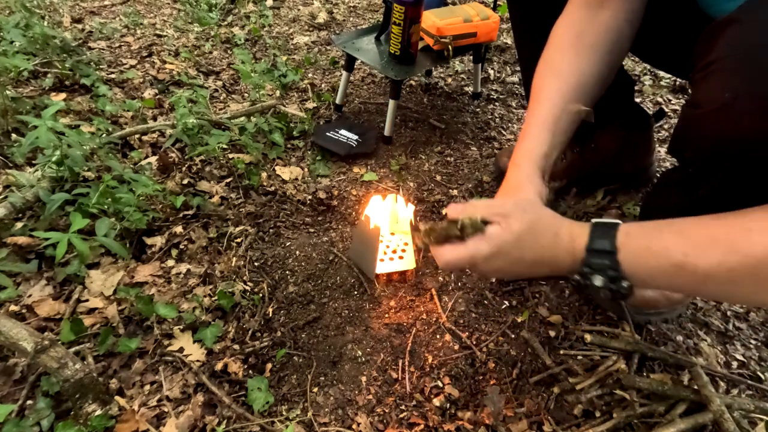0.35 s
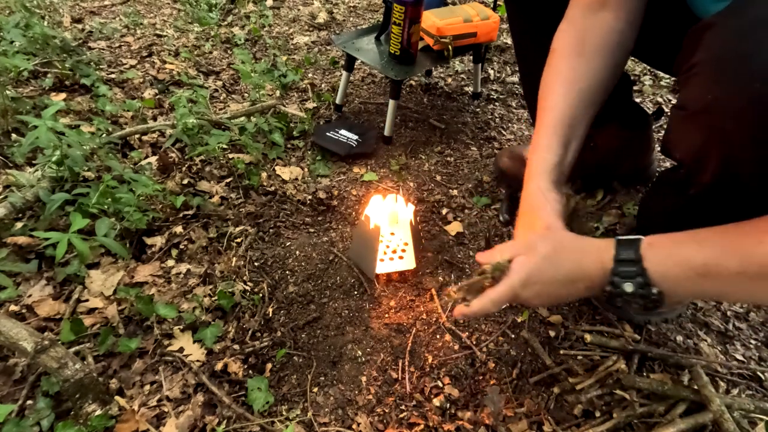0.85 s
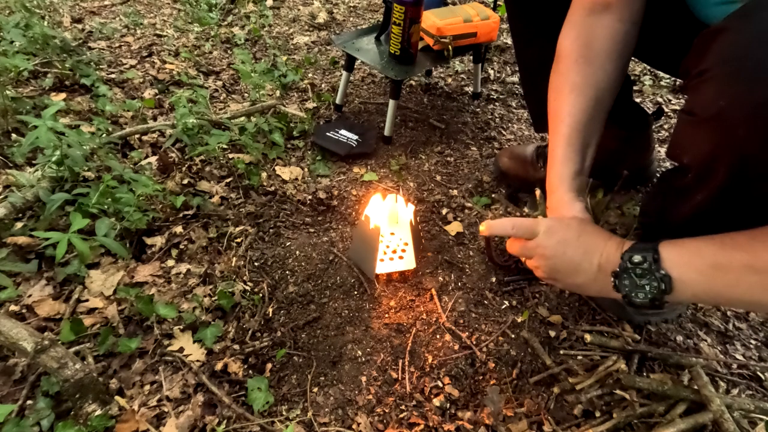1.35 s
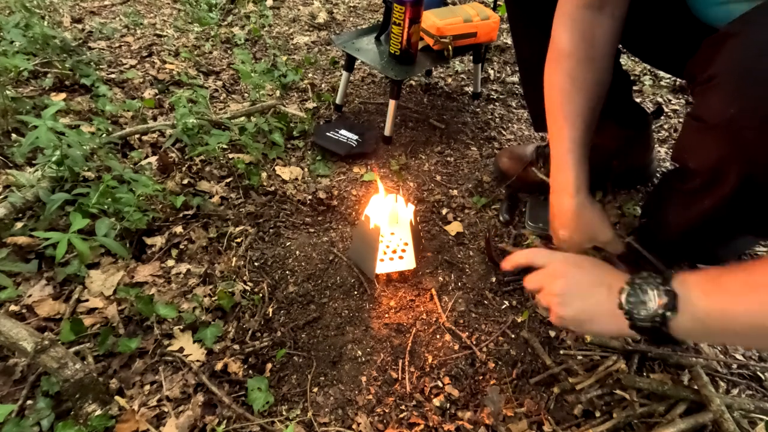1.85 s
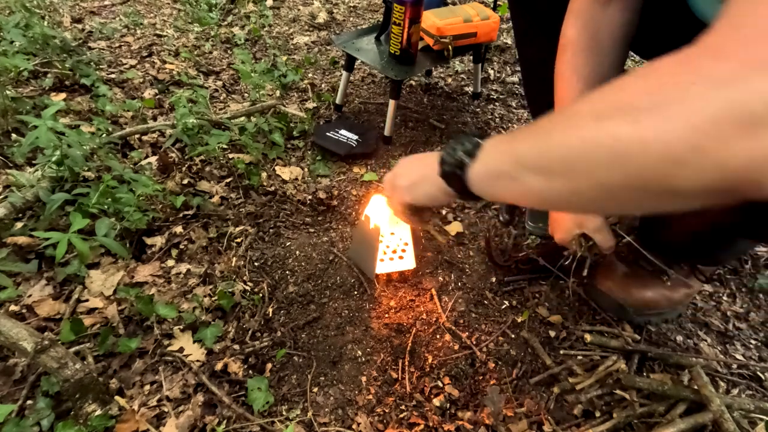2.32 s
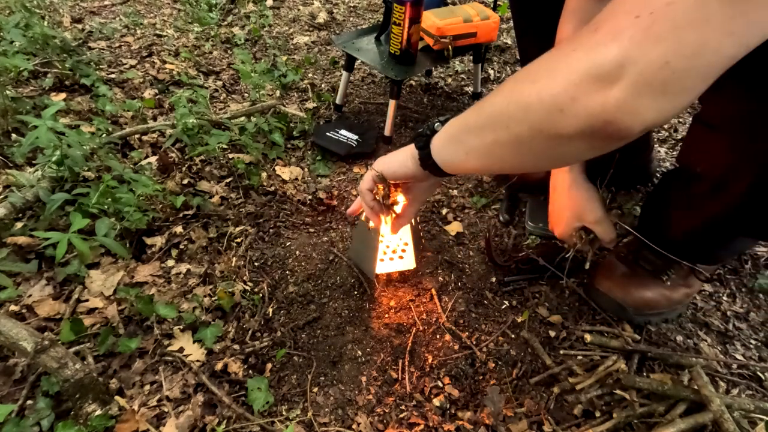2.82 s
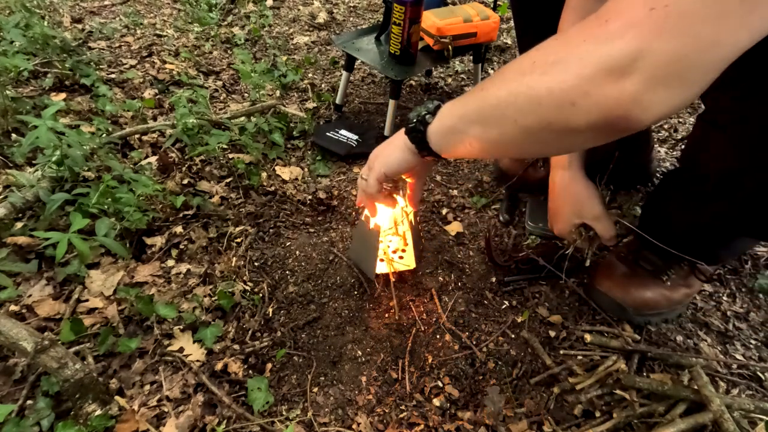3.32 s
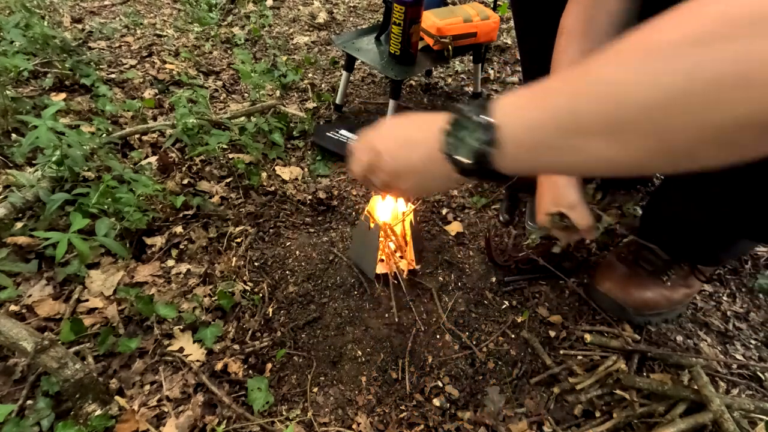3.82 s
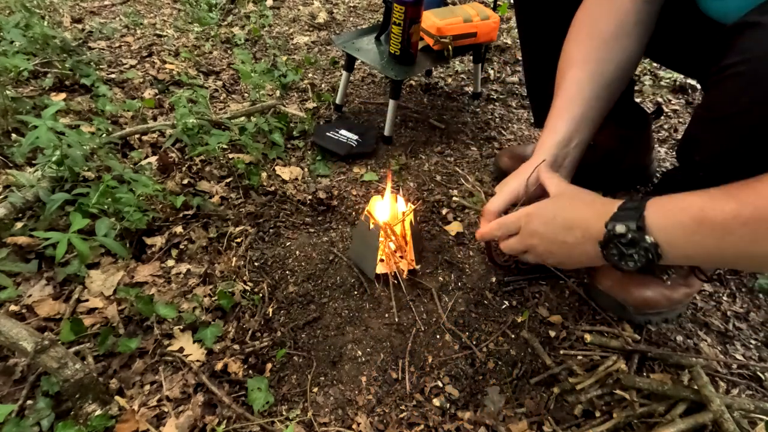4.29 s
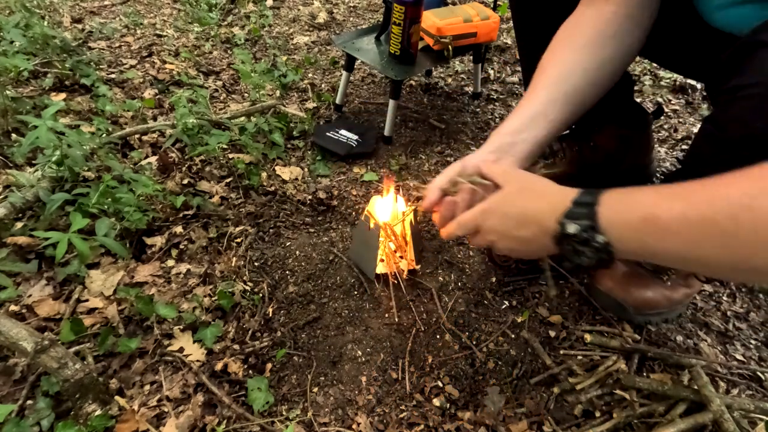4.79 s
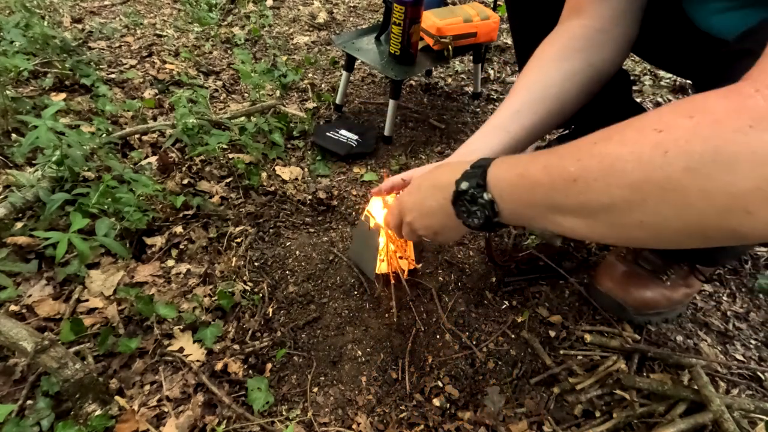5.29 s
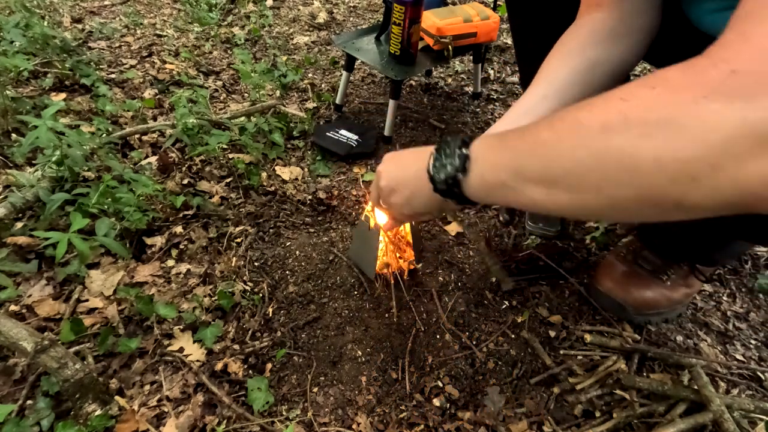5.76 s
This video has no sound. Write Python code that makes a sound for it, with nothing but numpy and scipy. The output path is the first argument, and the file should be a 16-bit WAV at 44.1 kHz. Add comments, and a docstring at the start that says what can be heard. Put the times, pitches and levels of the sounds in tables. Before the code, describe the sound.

Close up, a bundle of dry twigs is squeezed and broken in a dense, irregular run of sharp cracks, loudest just before two seconds. Cloth swishes as an arm reaches over, then twigs clink and scrape against a thin metal stove. After a quieter pause with faint crackles, a second load taps the metal more softly. Quiet woodland, soft flames and slight low wind; close stereo microphone.

```python
"""Dry twigs snap in the hands: filtered noise bursts, each with a ringing tone and a smaller crack near it.
Faint crackles of the fire follow by the same means, and low pressure pulses thump with some of the breaks.
The bundle crunches as gritty noise; twigs knock and scrape a small sheet-metal wood stove, heard as
a bank of decaying wall modes. Cloth swishes as the arms move, over woodland hush, flames and
light wind on two microphone ports, all of it shaped noise."""
import sys
import numpy as np
from scipy import signal
from scipy.fft import rfft, irfft, next_fast_len
from scipy.io import wavfile
from scipy.ndimage import uniform_filter1d

SR = 44100
rng = np.random.default_rng(int(sys.argv[2]) if len(sys.argv) > 2 else 0)


def invert_db(level):
    """Linear amplitude ratio for a level in decibels (20 dB per decade), elementwise."""
    return 10 ** (np.asarray(level, dtype=float) / 20)


def store_wav(level_fs):
    """Save 16-bit WAV to argv[1]."""
    pcm = np.round(np.clip(np.atleast_2d(level_fs), -1, 1) * 32767)
    wavfile.write(sys.argv[1], SR, pcm.T.astype(np.int16))


N = 270774  # length in samples


def evened(x):
    """Normalization: scales a signal to rms 1."""
    return x / np.sqrt(np.mean(x ** 2) + 1e-20)


def read(points, hz, column=1):
    """Interpolation on a logarithmic frequency axis, close to the ear's own scale."""
    points = np.transpose(points)
    return np.interp(np.log(hz + 1), np.log(points[0] + 1), points[column])


def follow(rows, column=1):
    """Envelope in dB: straight lines between the rows, silent outside their span."""
    rows = np.transpose(rows)
    return np.interp(np.arange(N) / SR, rows[0], rows[column], left=-200, right=-200)


def coloured(x, tone):
    """Linear filtering: weights the spectrum by the tone curve, silent outside it, at rms 1."""
    size = next_fast_len(N)
    hz = np.fft.rfftfreq(size, 1 / SR)
    inside = (hz >= tone[0][0]) & (hz <= tone[-1][0])
    weighted = rfft(x, size) * invert_db(read(tone, hz)) * inside
    return evened(irfft(weighted, size)[:N])


def drift(seconds):
    """Slow random fluctuation: white noise averaged twice, at rms 1."""
    size = round(seconds * SR)
    once = uniform_filter1d(rng.standard_normal(N), size)
    return evened(uniform_filter1d(once, size))


def grit(per_s, spread_db):
    """Random impulse train: sparse clicks of random sign, a few of them large."""
    when, sign, size = rng.random((3, N))
    size_db = spread_db * np.minimum(-np.log(size + 1e-9), 3)
    return (when < per_s / SR) * np.sign(sign - .5) * invert_db(size_db)


def add(mix, s, sound):
    """Superposition: mixes a sound in at s seconds."""
    part = mix[round(s * SR):][:len(sound)]
    part += sound[:len(part)]


def stroke_db(start, length, db, edge_db=-6.5):
    """Envelope of one stroke: an arch in dB, lower at both ends and silent outside."""
    u = (np.arange(N) / SR - start) / length
    return np.where((u > 0) & (u < 1), db + edge_db * (2 * u - 1) ** 2, -200)


def band_pass(x, band_hz):
    """Band-pass filtering between a low and a high corner."""
    return signal.sosfilt(signal.butter(2, band_hz, "band", fs=SR, output="sos"), x)


# Twigs cracking in the first two seconds, then faint crackles of the fire. Each row: start in seconds,
# relative level of the crack band in dB, thickness as the knock band against it in dB,
# ringing frequency in Hz, body band against the crack in dB.
CRACKS = [(0.0393, -40, -17, 1800, -2), (0.0591, -29.5, -21, 1690, -19), (0.174, -26, -8, 2480, -36),
          (0.1774, -28, -1, 2180, -27), (0.1852, -30.5, -23, 1590, -6), (0.194, -22.5, -27, 1740, -17),
          (0.2326, -22, -14, 2220, -3.5), (0.2439, -21.5, -21.5, 1710, -13),
          (0.3022, -39, -20.5, 1440, -14), (0.3227, -22, -16, 2290, -13), (0.3426, -39, -29, 2480, -17),
          (0.3545, -41, -25, 1320, -24), (0.404, -29.5, -13, 2890, -16), (0.408, -18.5, -25, 1340, -4),
          (0.4207, -22, -27, 2900, -17), (0.436, -26.5, -14.5, 2100, -4), (0.4515, -11, -9, 1800, -11),
          (0.51, -26.5, -11.5, 2040, -19), (0.5201, -34, -13, 1900, -2), (0.5314, -21, -27, 1860, -11),
          (0.551, -31.5, -30, 2210, -8), (0.5824, -37, -28, 2210, -10), (0.624, -37.5, -16, 1900, -8),
          (0.684, -46.5, 0.5, 2020, 5.5), (0.7223, -31.5, -13, 2180, -6), (0.7459, -30.5, -8, 2040, -12.5),
          (0.7539, -24.5, -25, 2040, -6.5), (0.7707, -16, -30.5, 1940, -17), (0.7926, -32, -23, 2230, -23),
          (0.8734, -25.5, -24, 2250, -12), (0.8834, -31.5, -16.5, 2310, 0), (0.89, -36, -5, 2310, -12),
          (0.976, -26, -14, 1780, -4), (0.9924, -15.5, -26, 2390, -6), (1.0555, -31, -13, 2940, -12),
          (1.07, -25, -18, 2320, -6), (1.0869, -23, -16, 3170, -17), (1.0968, -30, -28, 1470, -20),
          (1.1417, -37, -23, 1620, -19), (1.1592, -30, -24, 1820, -16), (1.2007, -13.5, -8.5, 3180, -11),
          (1.2173, -20.5, -22, 2590, -7), (1.2323, -26.5, -11.5, 2370, -3.5),
          (1.262, -21.5, -21, 2230, -6.5), (1.2976, -11, -12.5, 2880, -14), (1.3028, -25, -4.5, 1380, -4),
          (1.3108, -19.5, -21.5, 1250, -15), (1.3174, -20.5, -17.5, 1500, -3),
          (1.3433, -33.5, -20, 1700, -8), (1.3773, -23, -9, 1724, -25), (1.3864, -43, -8.5, 1910, -19),
          (1.3993, -31.5, -10.5, 1540, 1.5), (1.4112, -7.5, -22, 1710, -18.5),
          (1.4297, -8, -21, 1770, -13.5), (1.4497, -15.5, -18, 2020, -10.5), (1.4563, -25.5, -1, 1870, -16),
          (1.5504, -34, -13.5, 2040, -19), (1.575, -26.5, -33, 1960, -20), (1.5784, -25.5, -17, 1790, -13),
          (1.6066, -28, -10.5, 2180, -2), (1.6144, -17, -12, 1980, -3), (1.6431, -14, -24, 2010, -5),
          (1.6624, -44, -24.5, 2020, -19), (1.6782, -26, -15.5, 1870, -18), (1.6977, -33.5, -18, 1760, -6),
          (1.709, -11, -20, 1700, -14.5), (1.7164, -18, -19, 1800, -1), (1.7306, -7, -12.5, 1760, -1.5),
          (1.7358, -20.5, -33, 1390, -19), (1.746, -29, -19.5, 2150, -12), (1.796, -41, 1, 1870, -12),
          (1.921, -34.5, -6, 1550, -32), (2.0265, -42, -13, 2430, -5), (2.9618, -42, -10, 1580, -8),
          (3.971, -46, -9, 2060, -22), (4.4824, -42, -13, 2330, -16), (4.576, -36, -14.5, 1320, -29),
          (4.683, -40.5, 0.5, 1800, -32), (4.7312, -44, 3.5, 2170, 8), (4.8998, -40.5, -9, 1960, -23),
          (5.1804, -45, 2, 2010, 14.5), (5.775, -39, -2, 1960, -18), (6.1218, -39.5, -43, 1660, -13)]


def cracks_and_splinters():
    """Secondary fracture: every listed crack has one small splinter just before or after it."""
    reach_s, splinter_db, spread_db = .025, -20.5, 4
    big = np.array(CRACKS, float)
    late, size, thick, pitch = rng.standard_normal((len(big), 4)).T
    offsets = [reach_s * late, splinter_db + spread_db * size, 4 * thick, 0 * late, 0 * late]
    small = big + np.transpose(offsets)
    small[:, 0] = np.clip(small[:, 0], .01, N / SR)
    small[:, 3] *= 2 ** (0.14 * np.clip(pitch, -2, 1.5))
    return np.vstack([big, small]).T


# Bands of a crack, in the order crack, knock, body, top. Each row: low and high corner in Hz.
CRACK_BANDS = [(4194, 7490), (1375, 2130), (2916, 4600), (7540, 9670)]
# Ring and top band against the crack. Each row: dB at thickness 0, dB per dB of thickness, spread in dB.
RING_RULE = (-5, 0.42, 1.5)
TOP_RULE = (-13, -0.051, 3.3)


def snaps():
    """Brittle fracture: a creak, a tearing burst and a tail excite a resonance, in twigs and fire alike."""
    t, out, lead = np.arange(1500) / SR, np.zeros(N), .002  # lead in seconds
    s, crack_db, thick_db, ring_hz, body_db = cracks_and_splinters()
    chance = rng.standard_normal((len(s), 2)).T
    ring_db, top_db = (a + b * thick_db + c * z for (a, b, c), z in zip([RING_RULE, TOP_RULE], chance))

    fibres = rng.standard_normal((len(s), len(t)))
    parting = round((lead + .0009) * SR)
    fibres[:, parting] += 6 * np.sign(fibres[:, parting])  # the main fibre parts in one sharp pop
    after = np.maximum(t - lead, 0)
    creak = invert_db(-23) * (t < lead) * t / lead
    burst = (1 - np.exp(-after / 0.00088)) * np.exp(-after / 0.0011)
    reflections = [(.0014, -15.5), (.0037, -20.5)]  # ground, stove: delay in seconds, dB
    bounce = sum(invert_db(db) * np.interp(t - late, t, burst, left=0) for late, db in reflections)
    tail = invert_db(-29.0) * (t > lead) * np.exp(-after / 0.005)
    tearing = fibres * (creak + burst + bounce + tail)

    cracks = np.zeros_like(tearing)
    for band_hz, db in zip(CRACK_BANDS, [0 * s, thick_db, body_db, top_db]):
        part = band_pass(tearing, band_hz)
        unit = part / np.linalg.norm(part, axis=1, keepdims=True)
        cracks += unit * invert_db(crack_db + db + 14.0)[:, None]

    r = np.exp(-np.pi * 450 / SR)  # resonance 450 Hz wide
    for start, crack, tear, f, db in zip(s, cracks, tearing, ring_hz, crack_db + ring_db):
        ring = signal.lfilter([1, 0, -1], [1, -2 * r * np.cos(2 * np.pi * f / SR), r * r], tear)
        add(out, start - lead, crack + ring / np.linalg.norm(ring) * invert_db(db + 16))
    return out


# Low thumps with some of the breaks. Each row: start in seconds, relative level in dB.
LOW_THUMPS = [(1.202, -46.5), (1.299, -39.5), (1.413, -39), (1.433, -30), (1.732, -16.5), (1.922, -44.5)]


def thumps():
    """Pressure pulse: a slow one-sided push just after the listed time, with a weak swing back."""
    u, out = np.arange(4000) / SR / 0.00054, np.zeros(N)
    push = u ** 2 * np.exp(-u) * 1.19 - .03 * u * np.exp(-u / 12)
    for s, db in LOW_THUMPS:
        add(out, s + 0.00037, -invert_db(db) * push)
    return out


# Bundle squeezed in the hands. Each row: time in seconds, level in dB.
SQUEEZE = [(0, -54.5), (.11, -46), (.17, -40.5), (.21, -54), (.56, -59), (.66, -84), (1.06, -56),
           (1.14, -72), (1.5, -52), (1.66, -83), (1.8, -47), (2.0, -71.5)]
# Spectrum of rubbed bark, also used for the grit of scraping. Each row: frequency in Hz, relative dB per Hz.
BARK_TONE = [(110, -45.5), (180, -15.5), (567, -25.5), (762, -23), (1600, -10), (3000, -14.5), (3610, -11),
             (7020, -13), (10200, -18.5), (15000, -44.5)]


def crunch():
    """Frictional noise: bark and thin twigs rub and splinter in clumps of many tiny bursts."""
    bursts = signal.lfilter([1], [1, -np.exp(-1 / (.0008 * SR))], abs(grit(1600, 4.1)))
    clumps = invert_db(3 * np.clip(drift(.005), -2, 1.5))
    rubbing = rng.standard_normal(N) * (0.043 + evened(bursts) * clumps)
    debris = np.zeros(N)  # bits keep crunching after each crack
    for s, db, *_ in CRACKS:
        add(debris, s, invert_db(db - 30.5) * np.exp(-np.arange(8000) / SR / 0.014))
    return (invert_db(follow(SQUEEZE)) + debris) * coloured(rubbing, BARK_TONE)


# A handful of twigs and leaves scooped together. One row: start in seconds, length in seconds, level in dB.
HANDFUL = (.07, .11, -46.5)
# Spectrum of the scoop. Each row: frequency in Hz, relative dB per Hz.
HANDFUL_TONE = [(200, -7.5), (400, -11), (800, -12.5), (1500, 0), (2200, -9), (3500, -20)]


def scoop():
    """Granular friction: a soft, dull rustle that swells and fades."""
    grains = rng.standard_normal(N) * invert_db(4.3 * np.clip(drift(0.0047), -2, 1.5))
    return invert_db(stroke_db(*HANDFUL)) * coloured(grains, HANDFUL_TONE)


# Twigs dragged along the stove walls. Each row: start in seconds, length in seconds, relative level in dB.
DRAGS = [(3.131, 0.16, -46), (3.465, 0.36, -49.5), (5.204, 0.24, -58.5), (5.45, 0.22, -59.5),
         (5.751, 0.37, -66)]


def scrape_force():
    """Stick-slip contact: irregular grit pushes on the wall during each stroke."""
    strokes = sum(invert_db(stroke_db(*row)) for row in DRAGS)
    return strokes * evened(grit(900, 3.25)) * invert_db(2.8 * drift(0.019))


# Modes of the stove walls. Each row: frequency in Hz, relative level in dB,
# 60 dB decay time in seconds while the stove is not yet full.
WALL_MODES = [(620, -6, .12), (845, -10, .15), (1008, -2, .3), (1109, -5, .25), (1196, -3, .28),
              (1244, -4, .2), (1317, -5, .26), (1412, -7, .36), (1532, -3, .15), (1818, -3, .2),
              (1899, 0, .26), (2152, -6, .25), (2398, -5, .18), (2780, -12, .2), (3010, -10, .12),
              (3260, 0, .11), (3390, -2, .2), (3530, -8, .15), (3718, -7, .18), (3874, -6, .12),
              (4742, -6, .16), (4980, -10, .13), (5165, -8, .15), (5286, -8, .11), (5590, -1, .12),
              (5836, -5, .16), (6428, -7, .11), (7010, -11, .12), (7725, -10, .13), (8183, -14, .11),
              (8700, -13, .08), (10050, -9, .07), (12400, -22, .06), (14100, -24, .07)]
# Frequencies in Hz that part the modes into four groups.
GROUP_EDGES = [1500, 2600, 4300]


def wall_ring(knocks, tilt_db, drag):
    """Modal synthesis: knocks and scraping drive the same bank of damped resonators."""
    # the grate and seams add many weaker, quicker modes between the main ones
    minor = [(600 * 14 ** place, -9, (.05 + .1 * ring) * (1.3 - .7 * place))
             for place, ring in rng.random((60, 2))]
    modes = WALL_MODES + minor
    hz = np.transpose(modes)[0]
    s, knock_db, _, spot_hz = knocks
    count = len(s)
    group_db = tilt_db[np.searchsorted(GROUP_EDGES, hz)] + knock_db
    favour_db = 7 * np.exp(-(np.log(hz[:, None] / spot_hz) / .035) ** 2)
    # each knock lands on another spot, so every mode gets its own strength and sign
    chance = rng.standard_normal((count, len(hz), 2)).T
    spot = invert_db(group_db + favour_db - 11.0 + 3.7 * chance[0]) * np.sign(chance[1])
    # the rubbed spot moves, so modes take turns
    wander_db = 5 * rng.standard_normal((len(hz), N // 1000 + 2))
    at = np.round(s * SR).astype(int)
    # each twig skids on and touches again at other spots
    skid_s = .012 * rng.random((count, 3)).T * [[1], [2], [3]]
    skid_at = at + np.round(skid_s * SR).astype(int)
    skids = invert_db(group_db - 21.5)[:, None] * rng.standard_normal((count, 3, len(hz))).T

    out = np.zeros(N)
    loaded = round(5.2 * SR)  # from here the stove is full of twigs and its ringing is shorter
    for (f, db, t60), blows, turn_db, skid in zip(modes, spot, wander_db, skids):
        force = drag * np.repeat(invert_db(turn_db - 38), 1000)[:N]
        np.add.at(force, at, blows)
        np.add.at(force, skid_at, skid)
        np.add.at(force, at - 80, invert_db(-18.0) * blows)  # a side shoot touches first
        w = 2 * np.pi * f / SR
        for span, share in [(slice(0, loaded), 1), (slice(loaded, N), 0.6)]:
            r = np.exp(-np.log(1000) / (share * t60 * SR))
            ring = signal.lfilter([0, np.sin(w)], [1, -2 * r * np.cos(w), r * r], force[span])
            out[span] += invert_db(db) * ring
    return out


def clatter(knocks, tilt_db):
    """Contact noise: each blow of wood on metal gives a short wide-band burst."""
    s, knock_db = knocks[:2]
    t, out = np.arange(2500) / SR, np.zeros(N)
    decay = np.exp(-t / 0.014) + 2.2 * np.exp(-t / 0.0011)
    tick = rng.standard_normal((len(s), len(t))) * (1 - np.exp(-t / 0.00081)) * decay
    bands_hz = [(550, 4800), (1500, 2560), (2600, 3800), (4300, 8760)]  # one for each group of modes
    for band_hz, db in zip(bands_hz, tilt_db):
        part = band_pass(tick, band_hz)
        part *= invert_db(knock_db + db + 17.0)[:, None] / np.linalg.norm(part, axis=1, keepdims=True)
        for start, sound in zip(s, part):
            add(out, start - .001, sound)
    return out


# Twigs striking the stove. Each row: start in seconds, relative level in dB before the tilt,
# brightness in dB, frequency in Hz of the mode that the spot favours.
STRIKES = [(3.0016, -32, -10.5, 1899), (3.0821, -25.5, 3, 1109), (3.169, -27.5, -15, 1265),
           (3.199, -57, -6, 1899), (3.2225, -40.5, 10, 3010), (3.243, -38.5, 10, 5800),
           (3.2535, -38, -4.5, 1170), (3.348, -53, 11, 2860), (3.4393, -41.5, -1, 3260),
           (3.4967, -38.5, -2.5, 3390), (3.5501, -43, -2.5, 1899), (3.574, -32.5, 0.5, 1870),
           (3.6011, -35, -8, 3718), (3.629, -44.5, 4.5, 620), (3.6471, -44.5, 11.5, 3530),
           (3.6789, -42.5, 5, 2780), (3.6922, -70, 29.5, 7010), (3.7102, -34, -3, 3540),
           (3.7331, -46, 4.5, 4742), (3.7627, -48, 3, 1412), (3.8251, -44, 5, 5100), (3.85, -40, 0, 1412),
           (5.2093, -28, 11, 5600), (5.3114, -42, 2, 2152), (5.336, -44, -4, 2152), (5.356, -45, 2, 3140),
           (5.3774, -38.5, 2.5, 4000), (5.418, -60.5, 15, 3874), (5.4554, -40.5, -2.5, 2398),
           (5.5395, -49.5, 10, 6150), (5.562, -47, -2, 5836), (5.5977, -56, 15, 2950),
           (5.6605, -46.5, 5.5, 3630), (5.6927, -47, 2.5, 3874), (5.7421, -51, -6, 1412),
           (5.7805, -47, -8, 1412), (5.8408, -66.5, 25.5, 5590), (5.8578, -65, 17, 2152),
           (5.8977, -49, 8.5, 6050), (5.9637, -47, 4, 2398), (5.999, -49, 1, 1008),
           (6.071, -55.5, 12.5, 3010)]
# Gain of the four groups of modes, low to high, in dB per dB of brightness.
BRIGHTNESS_TILT = [-0.45, 0.2, 0.74, 0.95]


def stove():
    """Radiation from struck plates: wall modes, contact clatter and scraping noise."""
    knocks = np.transpose(STRIKES)
    tilt_db = np.outer(BRIGHTNESS_TILT, knocks[2])
    tilt_db[0] -= 6
    drag = scrape_force()
    out = wall_ring(knocks, tilt_db, drag) + clatter(knocks, tilt_db)
    out += invert_db(-6.5) * coloured(drag, BARK_TONE) * np.sqrt(np.mean(drag ** 2))
    # small walls radiate almost no bass
    return signal.sosfilt(signal.butter(3, 430, "high", fs=SR, output="sos"), out)


# Cloth as the arms move. Each row: time in seconds, level in dB, relative level of the dull band in dB.
CLOTH = [(0, -65, 13), (1.8, -60, -3), (1.99, -62.5, -8), (2.08, -53, -1), (2.2, -54, 5), (2.45, -70, 4.5),
         (2.7, -73.5, 10), (2.85, -64.5, 11), (3.4, -62.5, 10), (4.17, -72, 17), (4.3, -58.5, 12),
         (4.45, -64.5, 11.5), (5.02, -56, 7), (5.17, -57.5, 7), (6.14, -61.5, 7.5)]
# Spectrum of the bright rubbing. Each row: frequency in Hz, relative dB per Hz.
CLOTH_TONE = [(240, -49.5), (400, -32), (567, -29), (593, -34), (650, -27), (1540, -9), (2090, -7.5),
              (2740, -14.5), (3550, -9), (5510, -6.5), (8000, -13), (11200, -22.5), (15000, -32.5)]


def swish():
    """Friction noise: smooth rubbing of fabric, with a duller band that follows its own curve."""
    dull_hz = 2180
    dull_tone = [(dull_hz / 2.5, -14), (dull_hz, 0), (dull_hz * 1.43, -14)]
    bright = coloured(rng.standard_normal(N) + .5 * evened(grit(460, 8.9)), CLOTH_TONE)
    dull = coloured(rng.standard_normal(N), dull_tone)
    flutter_db = 1.2 * drift(.012)
    return invert_db(follow(CLOTH) + flutter_db) * (bright + invert_db(follow(CLOTH, column=2) - 12) * dull)


# Spectrum of woodland hush and flames. Each row: frequency in Hz, relative dB per Hz.
HUSH_TONE = [(71, -38.5), (120, -4.5), (200, -2.5), (271, -9), (312, -8.5), (375, -13.5), (598, -14.5),
             (649, -15), (975, -18.5), (1190, -7.5), (3110, -47.5), (5380, -16), (15500, -44)]


def hush():
    """Stationary noise: steady leaves and flames, gently flickering in level."""
    return invert_db(-67.5 + 0.25 * drift(0.054)) * coloured(rng.standard_normal(N), HUSH_TONE)


# Strength of the wind. Each row: time in seconds, level in dB before the lumps.
BREEZE = [(0, -68), (.8, -70.5), (2.0, -71), (2.7, -63), (4.3, -69), (4.85, -61.5), (5.2, -68.5),
          (6.14, -67.5)]
# Spectrum of the wind. Each row: frequency in Hz, relative dB per Hz.
BREEZE_TONE = [(15, -4.5), (30, 5), (50, 3), (80, -7.5), (130, -20), (300, -45)]


def wind():
    """Turbulent pressure: lumpy low-frequency noise on the ports."""
    lumps_db = 4 * np.clip(drift(.04), -2, 1.5)
    return invert_db(follow(BREEZE) + lumps_db) * coloured(rng.standard_normal(N), BREEZE_TONE)


# The two microphone ports. Each row: frequency in Hz, left minus right in dB,
# lead of the left in radians, likeness of the ports for diffuse sound from 0 to 1.
PORT_PAIR = [(60, 0, 0.18, 0.92), (200, -5.5, -0.84, 0.57), (710, -3.5, -0.55, 0.28),
             (1550, -2, -0.57, 0.3), (2580, -4.5, -1.73, 0.92), (3200, -9, -1, 0.59), (4130, -7, -.6, 0.53),
             (5000, -3.5, .1, 0.85), (9500, 1.5, -0.34, 1), (12500, -0.6, 0.94, .2), (15000, -2, 1.2, .1)]


def ports(near, diffuse, other):
    """Stereophonic differences: level and phase part the ports; diffuse sound is partly alike."""
    size = next_fast_len(N)
    hz = np.fft.rfftfreq(size, 1 / SR)
    # half of the difference goes to each port
    left = invert_db(read(PORT_PAIR, hz) / 2) * np.exp(.5j * read(PORT_PAIR, hz, column=2))
    unlike = np.sqrt(1 - np.clip(read(PORT_PAIR, hz, column=3), 0, 1))
    mid = rfft(near + diffuse, size)
    side = mid * (left - 1 / left) / (left + 1 / left) + unlike * rfft(other, size)
    return irfft(np.array([mid + side, mid - side]), size)[:, :N]


def scene():
    """Superposition of close twigs and stove, their scattering, and diffuse cloth, hush and wind."""
    near = snaps() + thumps() + stove() + crunch() + scoop()
    # leaves and hands scatter mostly treble; moving hands change the path
    taps = np.diff(rng.standard_normal(400) * np.exp(-np.arange(400) / 60.))
    echoes = signal.oaconvolve(near, taps / np.linalg.norm(taps))[:N]
    scattered = invert_db(-1.5) * echoes * drift(.003)
    diffuse, other = (swish() + hush() + wind() for _ in range(2))
    return ports(near, diffuse, 0.57 * other + scattered)


def top_cut(x):
    """Nothing passes above the cut-off."""
    return signal.sosfilt(signal.butter(12, 16800, fs=SR, output="sos"), x)


def record(dry):
    """Low-pass response: the microphone rolls off in the top octave."""
    dulled = signal.sosfilt(signal.butter(2, 12500, fs=SR, output="sos"), dry)
    return top_cut(dulled)


dry = scene()
out = record(dry)
store_wav(out)
```